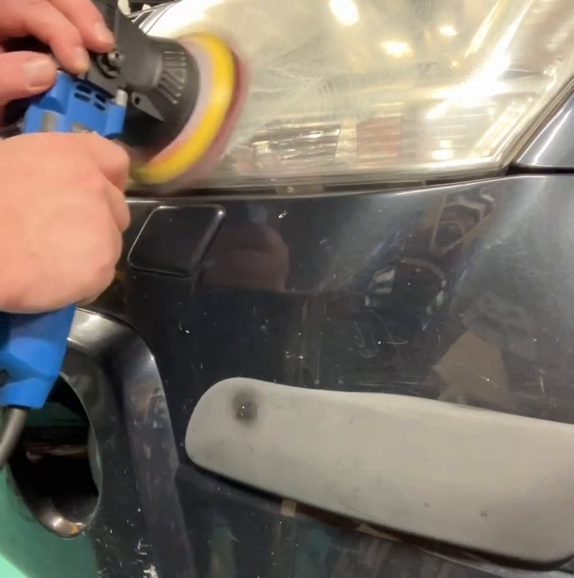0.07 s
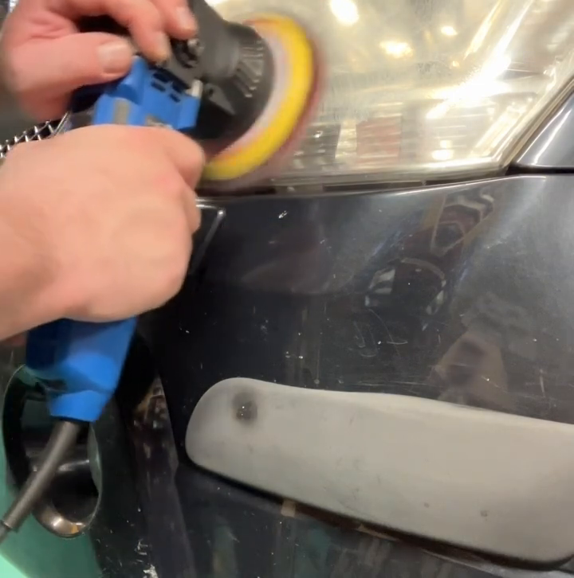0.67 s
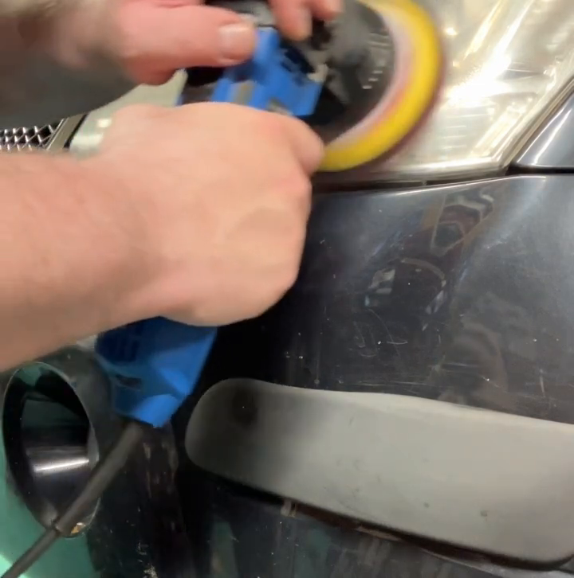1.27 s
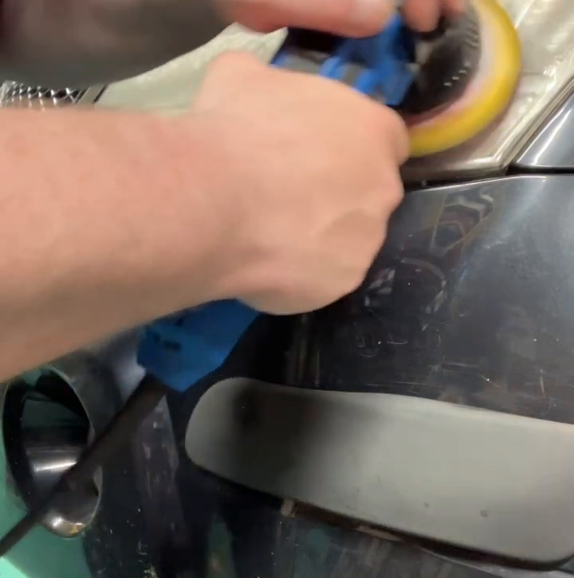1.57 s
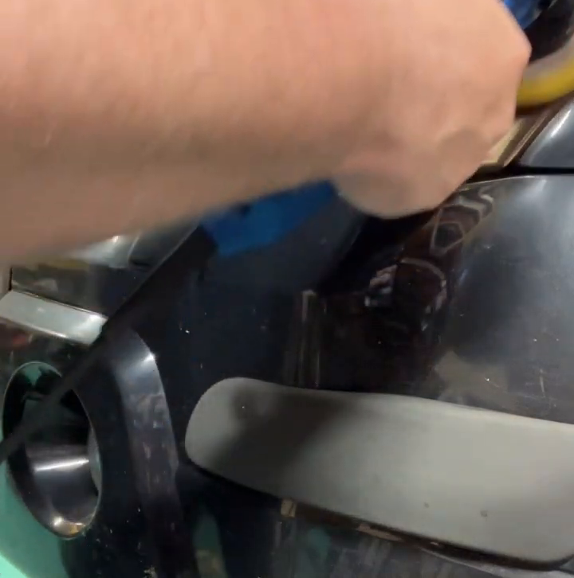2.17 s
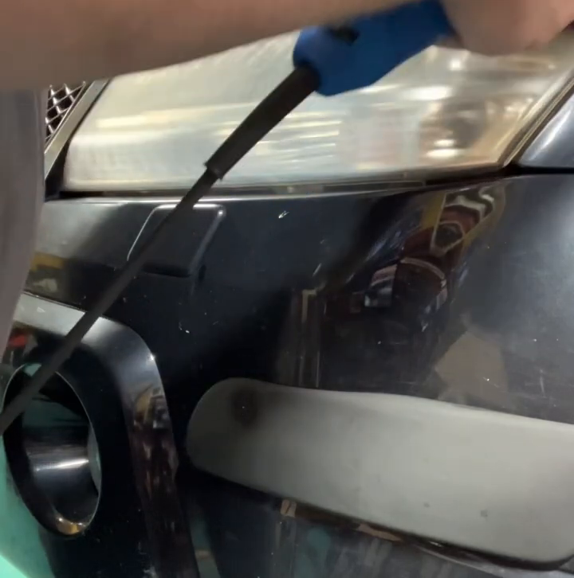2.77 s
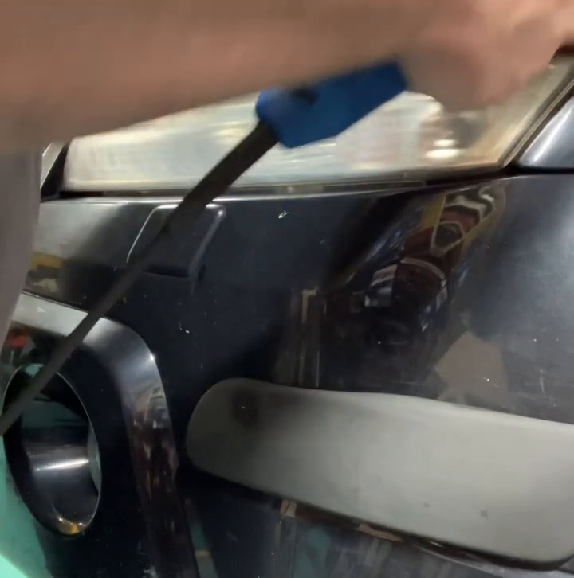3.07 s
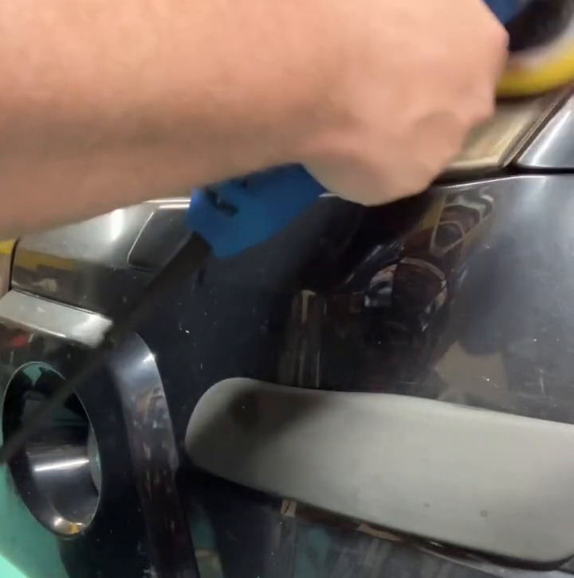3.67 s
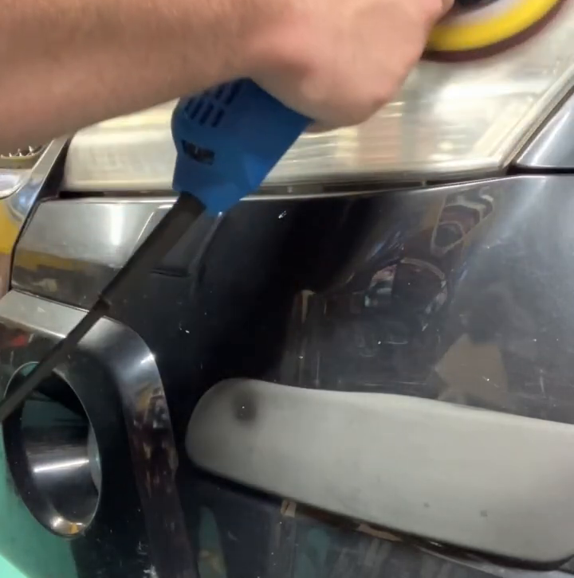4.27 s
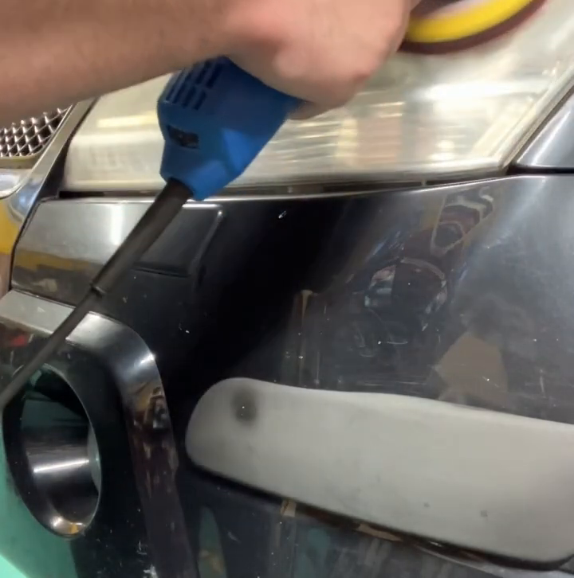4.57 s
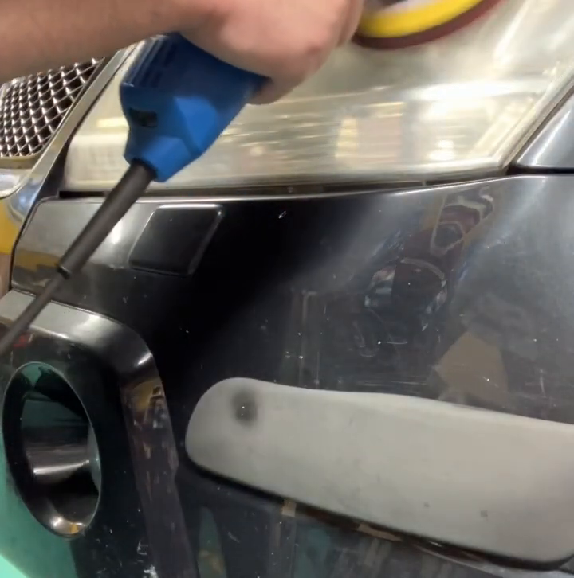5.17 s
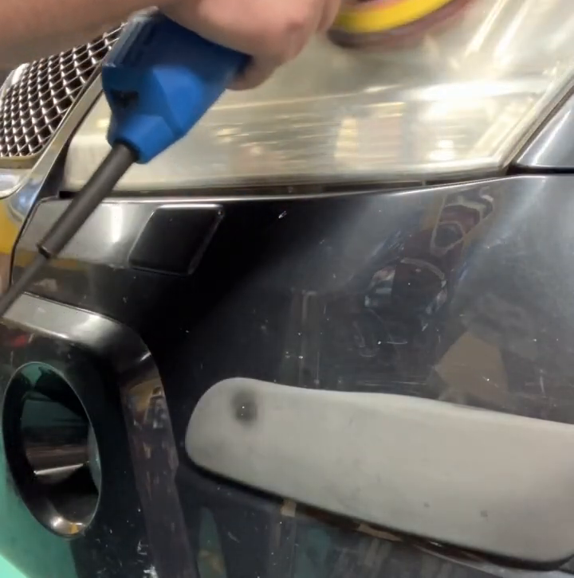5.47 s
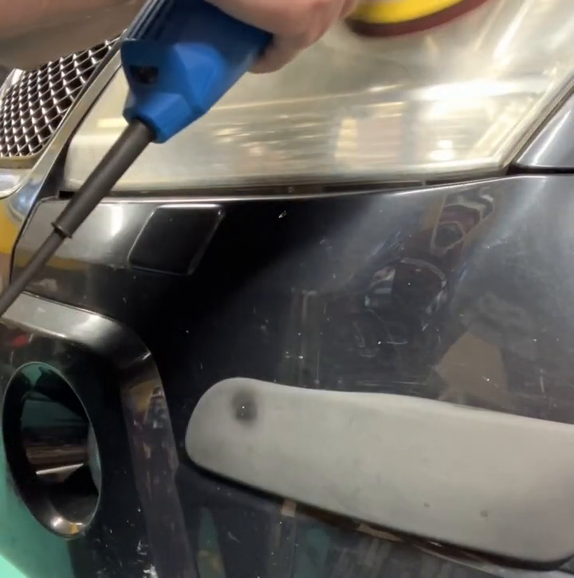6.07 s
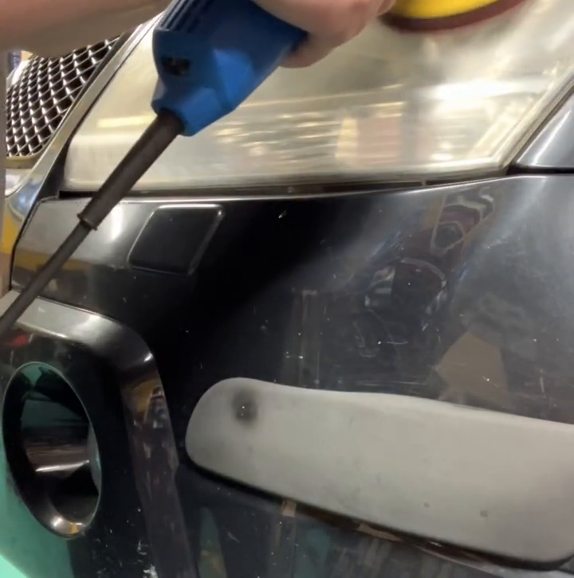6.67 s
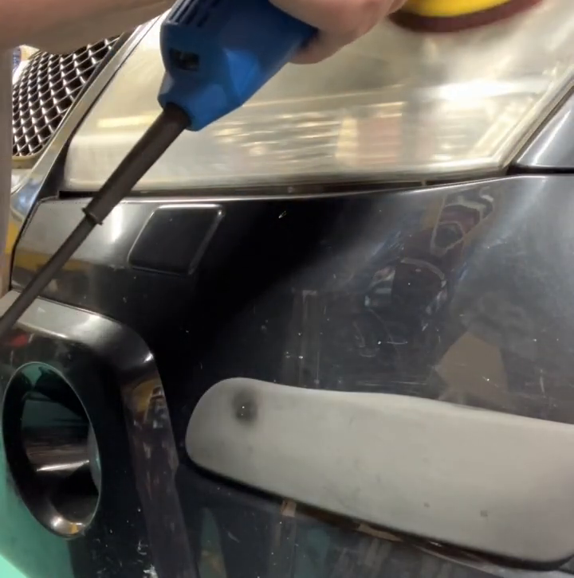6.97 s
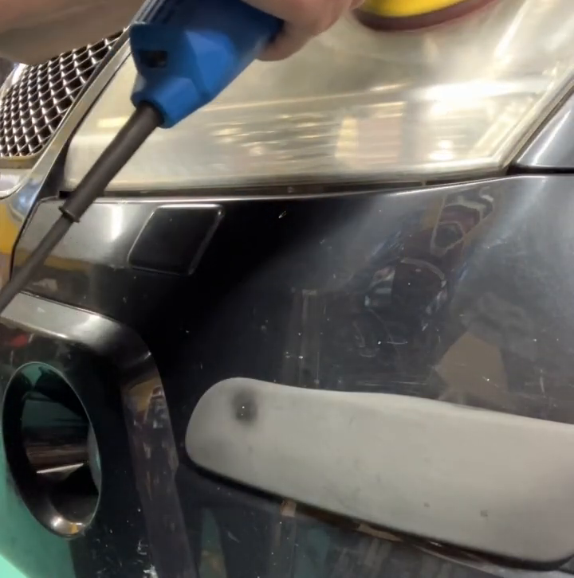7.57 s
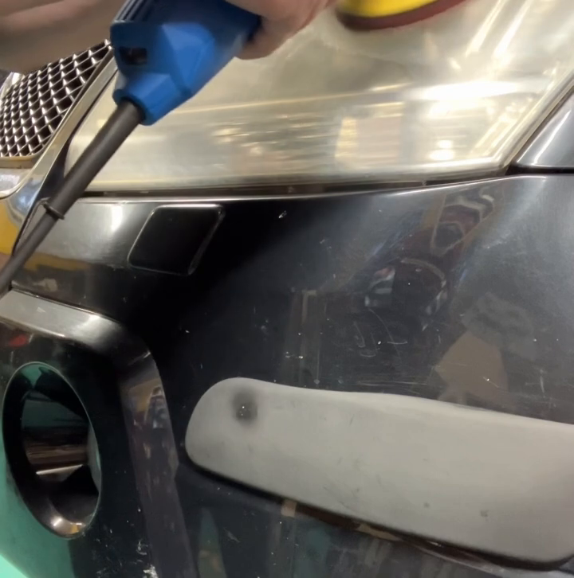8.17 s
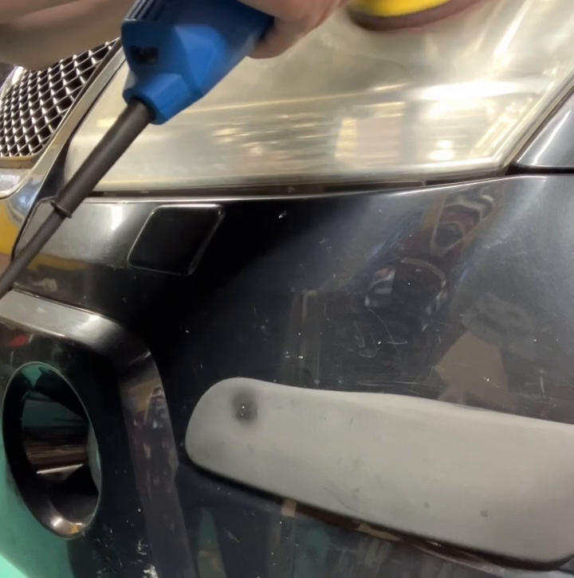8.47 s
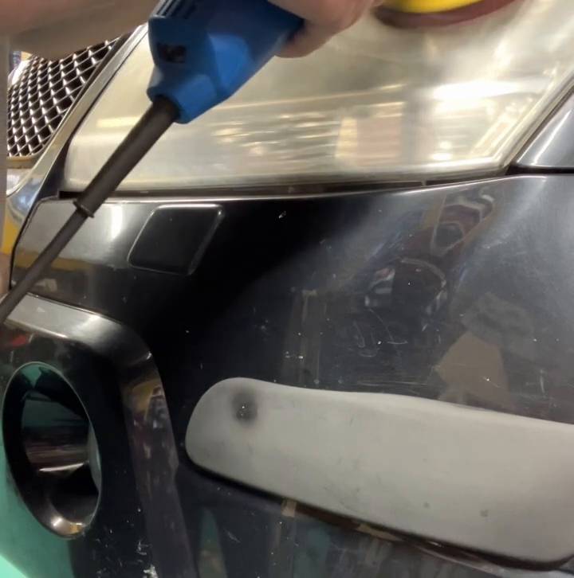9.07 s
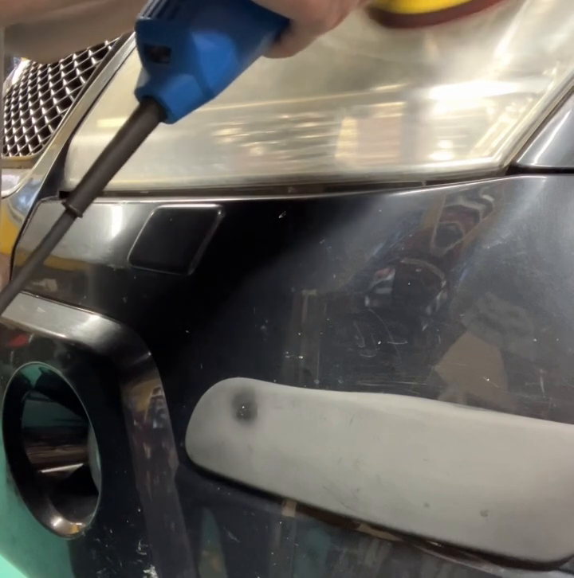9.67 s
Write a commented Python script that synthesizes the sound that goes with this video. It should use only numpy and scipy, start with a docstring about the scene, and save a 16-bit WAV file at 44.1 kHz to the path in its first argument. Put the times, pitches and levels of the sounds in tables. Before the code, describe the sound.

Heard close up in a garage, an electric polisher whines, whistles and rattles without a break while its foam pad rubs a plastic headlamp. A low hum and a pulsing drone sit beneath an airy hiss. The pad drums more at first, then less as the tool moves across the lamp and settles at its edge. The pitch stays nearly constant, dipping very slightly under pressure.

```python
"""In a garage, close up, a corded orbital polisher buffs a car's plastic headlamp.
Its mains motor whines, whistles and rattles through an 11:41 gear pair, over a hiss of air and foam.
The swinging weight hums; the slowly spinning pad throbs, drums on the lamp and rubs it into ringing.
All layers run throughout, coloured by the tool's pose: pressed on the lamp's face (pose 0),
slid across it (pose 1), then held at its upper edge (near pose 2)."""
import sys
import numpy as np
from scipy import signal
from scipy.fft import rfft, irfft, next_fast_len
from scipy.io import wavfile
from scipy.ndimage import uniform_filter1d, map_coordinates

SR = 44100
rng = np.random.default_rng(int(sys.argv[2]) if len(sys.argv) > 2 else 0)


def persist_wave(psi):
    """Save psi, clipped to +-1, as 16-bit WAV."""
    counts = np.round(np.clip(psi, -1, 1) * 32767).astype(np.int16)
    wavfile.write(sys.argv[1], SR, np.atleast_2d(counts).T)


N = 437031
TIME = np.arange(N) / SR
PINION_TEETH, WHEEL_TEETH, MAINS_HZ = 11, 41, 50


def from_db(db):
    """Decibels to gain."""
    return 10 ** (np.asarray(db) / 20)


def rms_one(x):
    """Scale to unit rms."""
    return x / np.sqrt(np.mean(x ** 2) + 1e-20)


def automation(rows):
    """A curve of straight ramps through (time [s], value) points."""
    return np.interp(TIME, *np.transpose(rows))


def excursion(curve, settle_s=1.55):
    """How far a curve stands above its moving average."""
    return curve - uniform_filter1d(curve, int(settle_s * SR), mode="nearest")


def pose_gain(pose, levels_db):
    """Gain gliding between levels spread evenly over poses 0 to 2."""
    return from_db(np.interp(pose, np.linspace(0, 2, len(levels_db)), levels_db))


def equalise(x, hz, levels_db, radians=0):
    """EQ with gains and phase shifts drawn on a log-frequency axis."""
    size = next_fast_len(N + SR // 10)
    log_hz = np.log(np.maximum(np.fft.rfftfreq(size, 1 / SR), 1))
    response = np.exp(np.interp(log_hz, np.log(hz), np.log(from_db(levels_db)) + 1j * radians))
    return irfft(rfft(x, size) * response, size)[:N]


def resonance(x, hz, width_hz):
    """Two-pole band-pass with unity gain at its peak."""
    r = np.exp(-np.pi * width_hz / SR)
    poles = [1, -2 * r * np.cos(2 * np.pi * hz / SR), r * r]
    return signal.lfilter(np.array([1, 0, -1]) * (1 - r * r) / 2, poles, x)


def drift(rate_hz):
    """Smooth random modulation of unit rms, rolling off above rate_hz."""
    hop, run_in = 40, 2000
    r = np.exp(-2 * np.pi * rate_hz * hop / SR)
    noise = rng.standard_normal(N // hop + run_in + 2)
    slow = signal.lfilter([1], [1, -2 * r, r * r], noise)[run_in:]
    return np.interp(np.arange(N) / hop, np.arange(len(slow)), rms_one(slow))


def angle(turns_per_s):
    """Angle in radians of something turning at this speed."""
    return 2 * np.pi * np.cumsum(turns_per_s) / SR


def tone(phase):
    """Sine of unit rms with a random start phase."""
    return np.sqrt(2) * np.sin(phase + rng.uniform(0, 2 * np.pi))


def roughness(phase):
    """A turning part's surface comes round on every turn: a noise loop of unit rms."""
    samples_per_turn = int(2 * np.pi * N / phase[-1])
    bumps = signal.resample(rng.standard_normal(samples_per_turn), 4 * samples_per_turn)
    bump_angles = np.linspace(0, 2 * np.pi, len(bumps), endpoint=False)
    return rms_one(np.interp(phase, bump_angles, bumps, period=2 * np.pi))


def tooth_load(rotor, orbit):
    """Gear load in dB: torque pulses twice a mains cycle, the weight tugs, the pinion runs off centre."""
    pulse = 2 * np.pi * 2 * MAINS_HZ * TIME
    torque, tug, second_tug, runout = tone(pulse), tone(orbit), tone(2 * orbit), tone(rotor)
    beats = tone(pulse + orbit) + (tug + second_tug) * runout / np.sqrt(2)
    return 1.25 * torque + 0.78 * tug + 0.94 * second_tug + 0.95 * runout + 0.9 * beats + 0.65 * drift(60)


# Fader ride of the gear whistle: (time [s], level [dB])
WHISTLE_RIDE = [(0, -32.5), (1.0, -38), (1.4, -33.5), (1.8, -44), (2.15, -29.5), (2.5, -36.5), (2.92, -46),
                (3.44, -30.5), (3.65, -36.5), (4.25, -43.5), (4.75, -38.5), (5.12, -44), (5.6, -39),
                (6.35, -44.5), (7.05, -37.5), (7.45, -42.5), (7.95, -35.5), (9.9, -40)]


def gear_whistle(shaft, flicker_db=1.96):
    """The meshing pinion teeth sing one flickering tone."""
    flicker = rms_one(from_db(flicker_db * drift(13)))
    return from_db(automation(WHISTLE_RIDE)) * flicker * tone(PINION_TEETH * shaft)


# Partials of the whine: (multiple of the rotor speed, level [dB] at each of poses 0, 1, 2)
WHINE_PARTIALS = [(1, -53.5, -58, -52.5), (3, -54, -66, -63.5), (5, -49.5, -52, -42.5),
                  (7, -47.5, -54, -61), (8, -46.5, -51, -50.5), (10, -46, -47, -61),
                  (12, -44.5, -45.5, -51), (13, -52, -46.5, -46), (14, -57, -53, -57), (18, -50, -58, -52),
                  (19, -55, -59, -45.5), (20, -55, -52, -45), (21, -45, -53, -46.5), (22, -35, -47.5, -43),
                  (23, -38, -47, -39.5), (24, -48, -39, -39), (25, -44.5, -34.5, -59), (26, -49, -46, -47),
                  (27, -48, -48, -50), (29, -50, -51, -56), (30, -46, -57, -45.5), (31, -62, -60, -53),
                  (36, -52, -55, -53), (37, -49, -50, -49), (38, -56, -62, -50), (42, -57, -60, -54),
                  (47, -51, -45, -48), (48, -54, -54, -48)]


def motor_whine(rotor, load_db, pose, surge_db, waver_db=2.8):
    """Fan blades, gear teeth and commutator bars sing rotor harmonics; the load adds sidebands."""
    shaft = rotor + 0.023 * drift(13.5)   # the shaft twists to and fro in the gear play
    out = gear_whistle(shaft)
    surge = from_db(0.85 * surge_db)
    for multiple, *levels_db in WHINE_PARTIALS:
        waver = rms_one(from_db(waver_db * drift(6.4)))
        partial = tone(round(multiple) * shaft + 0.25 * drift(9.1))
        out += pose_gain(pose, levels_db) * surge * waver * partial
    return out * rms_one(from_db(0.9 * load_db))


def tooth_knocks(load_db, density, spread_db):
    """Teeth slap in their play, most often at the crests of the load, now and then hard."""
    hits = rng.random(N) < density * rms_one(from_db(2 * load_db)) / SR
    polarity = rng.choice([-1, 1], N)
    strength = from_db(spread_db * np.minimum(rng.exponential(1, N), 5))
    return rms_one(hits * polarity * strength)


# Ring of housing and gear case: (pitch [Hz], width [Hz], level [dB] at each of poses 0, 0.5, 1, 1.5, 2)
HOUSING_MODES = [(1340, 150, -52, -52, -43.5, -45.5, -45), (1527, 160, -58, -54, -60, -47, -44.5),
                 (2330, 410, -41.5, -37.5, -51, -40.5, -52.5), (3056, 280, -33.3, -35.7, -36.7, -48, -42.5),
                 (3466, 450, -47, -41, -41.5, -35.5, -34.8), (4020, 300, -44, -36, -47, -39, -46.5),
                 (5160, 570, -40.5, -39.5, -61, -42, -44), (6790, 400, -29.8, -37.5, -40, -36.2, -30.8),
                 (7140, 348, -43, -38, -34.5, -47, -51), (10660, 590, -42.5, -48, -41.5, -40, -43),
                 (13850, 500, -45, -42, -44, -45, -43)]


def housing_rattle(orbit, load_db, pose, surge_db, knock_db=-8, wear_db=-7.5, stagger_s=0.003):
    """Sliding teeth, the worn wheel's repeating pattern and the knocks ring the housing."""
    knocks = from_db(knock_db) * tooth_knocks(load_db, density=700, spread_db=3.2)
    wear = from_db(wear_db) * roughness(orbit)
    pressure = rms_one(from_db(load_db))
    out = np.zeros(N)
    for k, (hz, width_hz, *levels_db) in enumerate(HOUSING_MODES):
        force = (rng.standard_normal(N) + wear) * pressure + knocks * (-1) ** k
        force = np.roll(force, int(rng.random() * stagger_s * SR))   # each part shakes at its own moment
        ringing = resonance(resonance(force, hz, width_hz), hz, 2 * width_hz)
        out += pose_gain(pose, levels_db) * rms_one(ringing)
    return out * from_db(0.8 * surge_db)


# EQ of fan air and pad rub: (frequency [Hz], level [dB] at each of poses 0, 1, 2)
HISS_EQ = [(30, -92, -90, -91), (110, -82, -87, -82), (159, -80, -78, -80), (300, -71, -79, -77.5),
           (464, -70, -73.5, -74), (690, -74.5, -78, -75.5), (1050, -74.5, -75.5, -77.5),
           (1880, -67.5, -70, -72.5), (4700, -70, -73, -68), (8070, -66.5, -70, -69),
           (9440, -73.5, -71.5, -73.5), (12000, -75.5, -76.5, -75.5), (15500, -75, -76.5, -75)]
# Trim on the hiss: (gain [dB] at each of poses 0, 0.5, 1, 1.5, 2)
HISS_TRIM = [-0.27, -0.46, -0.7, -0.84, -0.15]


def air_and_rub(rotor, load_db, pose, buzz_db=-10, tick_db=-10, buzz_above_hz=5000):
    """Cooling air and foam hiss, brushes buzz on the commutator, teeth tick; all pulse with the load."""
    low_cut = signal.butter(2, buzz_above_hz, "high", fs=SR, output="sos")
    buzz = from_db(buzz_db) * signal.sosfilt(low_cut, roughness(rotor))
    source = (rng.standard_normal(N) + buzz) * rms_one(from_db(0.84 * load_db))
    source += from_db(tick_db) * tooth_knocks(load_db, density=400, spread_db=3.5)
    hz, *curves_db = np.transpose(HISS_EQ)
    out = np.zeros(N)
    for k, curve_db in enumerate(curves_db):
        crossfade = np.maximum(1 - abs(pose - k), 0)
        out += crossfade * equalise(source, hz, curve_db)
    return out * np.sqrt(SR / 2) * pose_gain(pose, HISS_TRIM)


# Low hum of the weight, and its octave: (level [dB] at each of poses 0, 0.5, 1, 1.5, 2)
HUM_LEVELS = [-38, -37.5, -35.5, -34.5, -33]
OCTAVE_LEVELS = [-58, -54.5, -52, -49.5, -55.5]


def weight_hum(orbit, spin, pose, sag, flutter_depth=0.035, damping_db_per_sag=3.5):
    """The swinging weight hums, fluttered by the off-centre pad; a push of the hand damps its octave."""
    flutter = 1 + flutter_depth * (tone(spin) + tone(2 * spin) + drift(5)) / 2
    hum = pose_gain(pose, HUM_LEVELS) * flutter * tone(orbit)
    octave = pose_gain(pose, OCTAVE_LEVELS) * from_db(-damping_db_per_sag * sag) * tone(2 * orbit)
    return hum + octave


def throb(phase, spin, pose, depth):
    """A tone whose level and pitch sway with the pad's spin."""
    overhang = 1 + 0.23 * (pose - 1)   # near the edge the pad bears on one side and throbs more
    sway = tone(spin) + 0.26 * (tone(2 * spin) + drift(8))
    tremolo = 1 + depth * overhang * sway
    return rms_one(tremolo * tone(phase + 0.2 * tone(spin)))


# Fader ride of the lamp's drumming: (time [s], level [dB])
DRUM_RIDE = [(0.1, -35), (1.12, -28), (1.43, -40), (3.03, -49), (3.5, -41), (5.07, -47), (5.6, -44),
             (9.5, -50)]


def lamp_drum(orbit, spin, pose):
    """The pad drums on the lamp three times an orbit."""
    return from_db(automation(DRUM_RIDE)) * throb(3 * orbit, spin, pose, depth=0.18)


# Overtones of the swing: (multiple of the orbit, level [dB] at each of poses 0, 0.5, 1, 1.5, 2, throb)
PAD_PARTIALS = [(4, -43, -50.5, -53, -46, -45.5, 0.13), (5, -53, -48.5, -55, -55, -55, 0.24),
                (6, -54, -48.5, -58, -49.5, -46.5, 0.3), (7, -52, -51.5, -57, -56.5, -55.5, 0.32),
                (8, -56, -51, -57.5, -61, -62, 0.43)]


def pad_overtones(orbit, spin, pose):
    """The rubbing pad adds harmonics of its swing, each throbbing with the spin."""
    return sum(pose_gain(pose, levels_db) * throb(round(multiple) * orbit, spin, pose, depth)
               for multiple, *levels_db, depth in PAD_PARTIALS)


# Body of the plastic lamp: (pitch [Hz], width [Hz], level [dB] at each of poses 0, 0.5, 1, 1.5, 2)
LAMP_MODES = [(223.1, 25, -41.5, -47, -55.5, -43, -50), (449, 67, -58, -51, -61, -47, -56),
              (592, 110, -56, -49, -54, -56, -56), (866, 150, -50.5, -60, -60, -61, -56.5)]


def lamp_ring(pose):
    """Dragging foam stirs the lamp's resonances with noise."""
    out = np.zeros(N)
    for hz, width_hz, *levels_db in LAMP_MODES:
        ringing = resonance(resonance(rng.standard_normal(N), hz, width_hz), hz, width_hz)
        out += pose_gain(pose, levels_db) * rms_one(ringing)
    return out


def bodywork_echoes(x, pose, echo_db=-17.5, travel_s=0.0006, count=5):
    """Echoes off bonnet and arms comb the sound, and the comb slides as the tool moves."""
    out = x.copy()
    for delay_s, direction in rng.uniform([0.001, -1], [0.008, 1], (count, 2)):
        lag = (delay_s + travel_s * direction * pose) * SR
        out += from_db(echo_db) * map_coordinates(x, [np.arange(N) - lag], order=3)
    return out / np.sqrt(1 + count * from_db(echo_db) ** 2)


# EQ of the room's reflections in the side channel: (frequency [Hz], level against the direct sound [dB])
ROOM_EQ = [(80, -38), (330, -24), (560, -8.5), (900, -6), (1400, -6.3), (3000, -4.5), (4200, -13.5),
           (5500, -19.5), (6500, -45), (8000, -76)]
# Stereo placement of the tool: (frequency [Hz], left minus right [dB], phase lead of the left [rad])
TOOL_PAN = [(80, -1.7, -0.25), (300, -1.7, -0.16), (700, -2.5, -.25), (2800, -2.8, -0.35),
            (4000, 0.2, 0.024), (6000, 0, 0)]


def garage(x, t60_s=0.17):
    """Short reflections from car and walls widen the mids; the tool sits a little to the right."""
    t = TIME[:SR // 4]
    tail = rng.standard_normal(len(t)) * from_db(-60 * t / t60_s)
    reverb = signal.fftconvolve(x, tail / np.linalg.norm(tail))[:N]
    side = equalise(reverb, *np.transpose(ROOM_EQ))
    hz, pan_db, lead = np.transpose(TOOL_PAN)
    left = equalise(x, hz, pan_db / 2, lead / 2) + side
    right = equalise(x, hz, -pan_db / 2, -lead / 2) - side
    return np.array([left, right])


# The tool's move over the lamp: (time [s], pose [0 face, 1 sliding, 2 upper edge])
TOOL_MOVE = [(0, 0), (.6, .03), (1.45, 0.52), (1.9, .65), (2.65, 1.1), (3.4, 1), (3.9, 1.32), (4.5, 1.5),
             (5.25, 1.92), (7, 1.93)]
# The motor, slowing whenever the hand bears down: (time [s], rotor speed [turns/s])
MOTOR_SPEED = [(0, 291.9), (1.2, 291.6), (1.55, 293.3), (2.1, 291.9), (2.8, 292.9), (3.4, 289.2),
               (3.7, 290.1), (4.4, 291.0), (5.2, 289.5), (6.1, 289.7), (6.85, 291.2), (8.05, 289.5),
               (9.25, 291.2), (9.9, 290.2)]
# Free rotation of the pad: (time [s], speed [turns/s])
PAD_SPEED = [(0, 6.5), (1.2, 6.6), (3, 6), (4.4, 8), (5.5, 6.3), (7, 5.26), (9.9, 4.74)]


def scene():
    """One rotor drives the tool; the pose colours the layers and each push shifts their balance."""
    pose = np.clip(automation(TOOL_MOVE), 0, 2)
    speed = automation(MOTOR_SPEED)
    sag = -excursion(speed)   # turns/s lost to a push of the hand
    # rattle and whine swell with each push, and a little with the whistle
    surge_db = 1.1 * sag + 0.16 * excursion(automation(WHISTLE_RIDE))
    rotor = angle(speed)
    orbit = rotor * PINION_TEETH / WHEEL_TEETH
    load_db = tooth_load(rotor, orbit)
    rasp = housing_rattle(orbit, load_db, pose, surge_db) + air_and_rub(rotor, load_db, pose)
    mix = motor_whine(rotor, load_db, pose, surge_db) + bodywork_echoes(rasp, pose)
    spin = angle(automation(PAD_SPEED) * (1 + 0.028 * drift(1)))
    mix += weight_hum(orbit, spin, pose, sag)
    mix += lamp_drum(orbit, spin, pose) + pad_overtones(orbit, spin, pose) + lamp_ring(pose)
    return garage(mix)


def record(dry, cutoff_hz=15700):
    """A steep high cut on the master."""
    return signal.sosfilt(signal.ellip(16, 0.1, 100, cutoff_hz, fs=SR, output="sos"), dry)


dry = scene()
out = record(dry)
persist_wave(out)
```